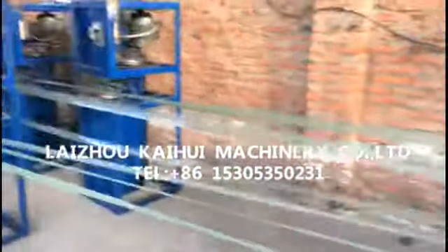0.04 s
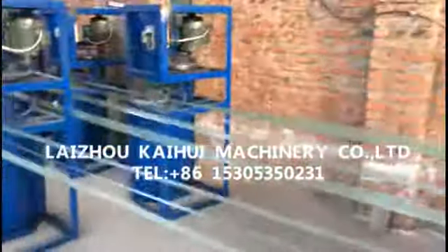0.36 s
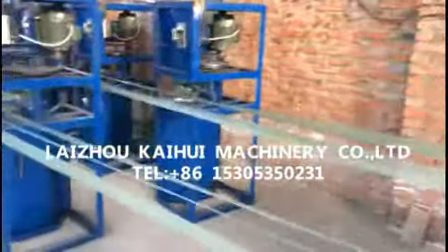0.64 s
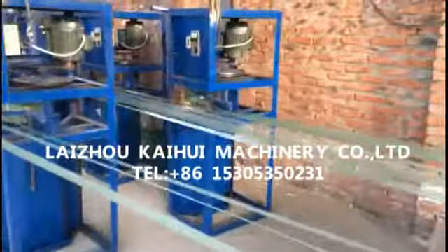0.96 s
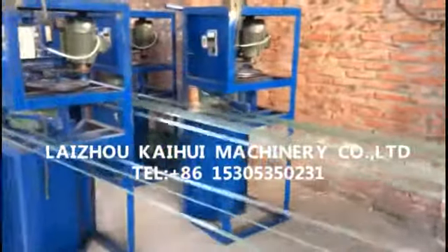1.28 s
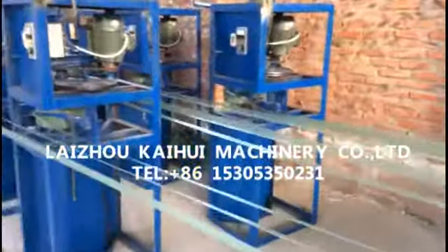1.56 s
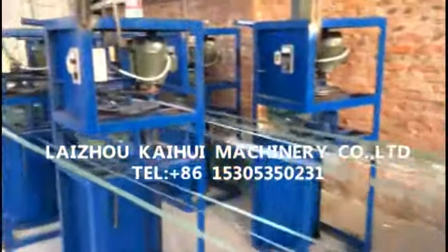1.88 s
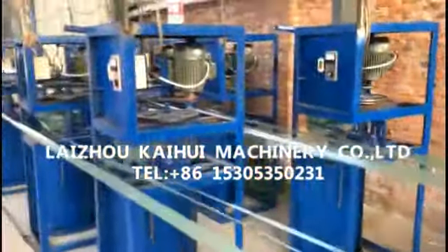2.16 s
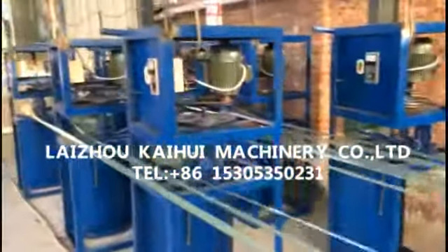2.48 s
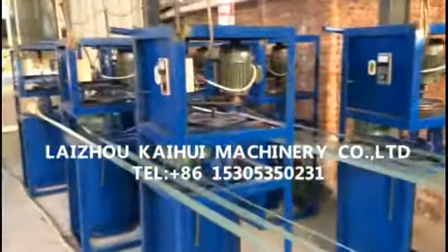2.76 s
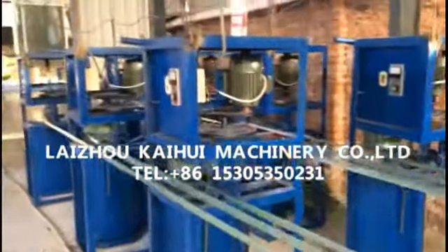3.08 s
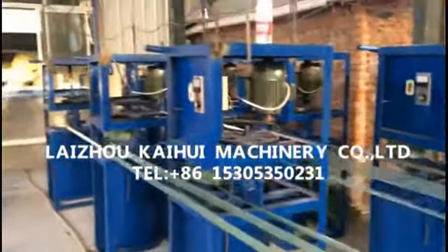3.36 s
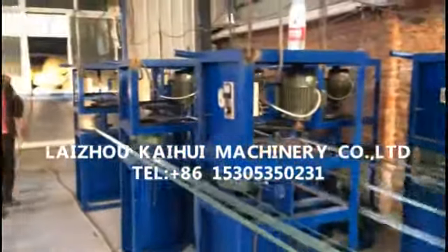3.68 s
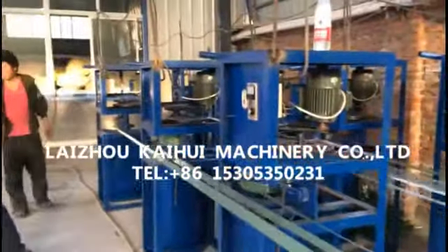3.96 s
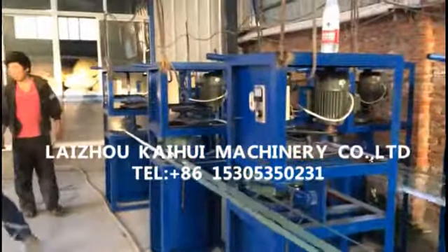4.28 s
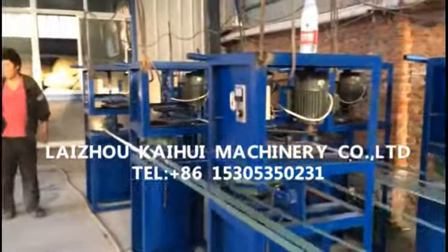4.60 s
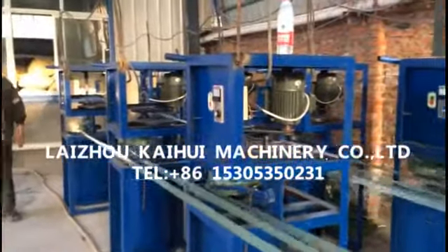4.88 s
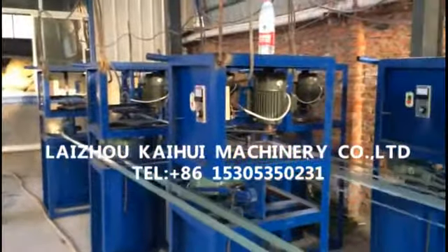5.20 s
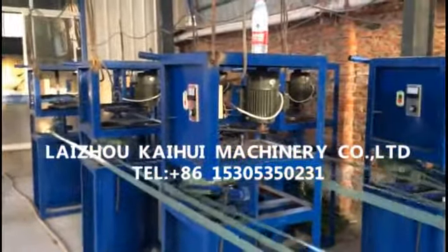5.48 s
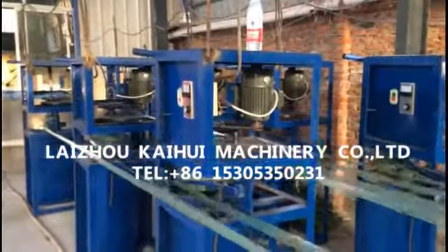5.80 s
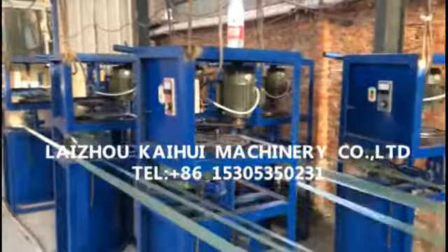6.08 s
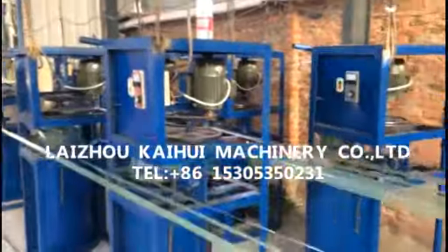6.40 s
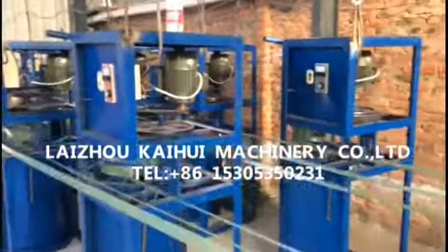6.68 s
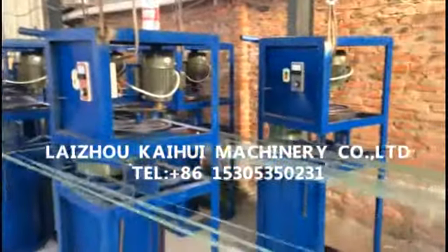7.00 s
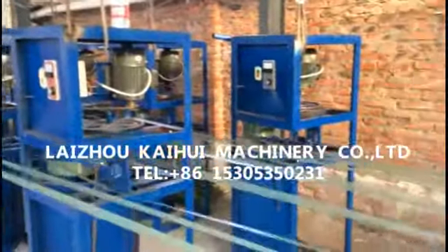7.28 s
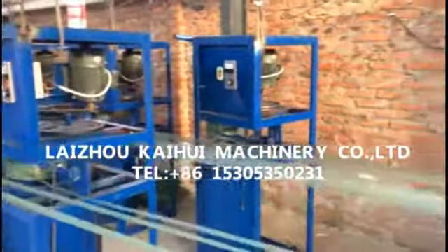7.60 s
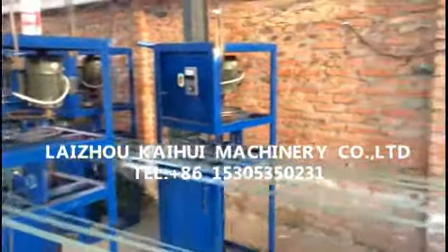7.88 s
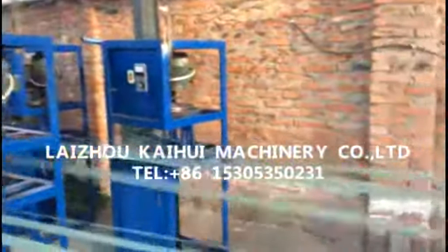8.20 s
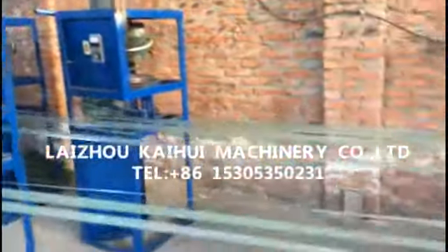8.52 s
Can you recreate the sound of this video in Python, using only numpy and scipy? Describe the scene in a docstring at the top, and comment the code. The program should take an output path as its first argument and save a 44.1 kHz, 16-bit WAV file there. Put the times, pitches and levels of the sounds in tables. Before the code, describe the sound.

A row of twine winding machines runs with a steady din of hissing tape, rattling steel, motor hum and gear whine.

```python
"""A steady din of rattling steel, hum, whine and hiss: a row of twine winders runs in a brick factory hall.
Knocks ring the steel frames, motors hum, gear trains whine at slightly different speeds, spinning drums
churn the air, and plastic tape hisses through its guides. The hall's echoes smear every tone, and the
balance shifts as the listener slowly turns from the wall to face along the row, then back."""
import sys
import numpy as np
from scipy import signal
from scipy.fft import rfft, irfft, next_fast_len
from scipy.io import wavfile

SR = 44100
rng = np.random.default_rng(int(sys.argv[2]) if len(sys.argv) > 2 else 0)


def output_pcm(signal):
    """Save a mono or channel-first signal as 16-bit PCM at the path in sys.argv[1].

    Samples are clipped to [-1, 1] before scaling.
    """
    pcm = np.clip(np.atleast_2d(signal).T, -1, 1) * 32767
    wavfile.write(sys.argv[1], SR, np.round(pcm).astype(np.int16))


N = 381465
TIME = np.arange(N) / SR

# Throughout, turn is 0 facing the wall and 1 along the row; facing_db is the gain added at turn = 1.
# Resonances of the steel frames: pitch_hz, width_hz, relative_db, facing_db
FRAME_MODES = [(1380, 86, -11, 4), (1451, 35, -0.5, 5), (1773, 112, 2, -2), (1851, 45, 3.5, -1),
               (1911, 26, 3, .5), (2386, 43, 5.5, 0), (2437, 48, -4, -2), (2700, 20, -7, 2),
               (2867, 24, -2, 5), (2889, 42, 4.5, -2), (3163, 54, -1, 2), (3455, 130, 0, -1.5),
               (3978, 41, 3.5, 1), (4130, 85, -5, -2), (4620, 94, 3.5, -4.5), (4820, 120, -1, -6)]


def undb(db):
    """Decibels to amplitude gain."""
    return 10 ** (np.asarray(db) / 20)


def unit(x):
    """Scale to rms 1."""
    return x / np.sqrt(np.mean(x ** 2))


def curve(points):
    """Linear interpolation of (time_s, value) points at every sample."""
    return np.interp(TIME, *np.transpose(points))


def bump(centre_s, sigma_s):
    """A Gaussian pulse of height 1."""
    return np.exp(-.5 * ((TIME - centre_s) / sigma_s) ** 2)


def waver(rate_hz):
    """Band-limited random motion of spread 1 that changes rate_hz times a second."""
    knots = rng.standard_normal(512)
    smooth = unit(signal.resample(knots, 4 * len(knots)))
    return np.interp(TIME, np.linspace(0, len(knots) / rate_hz, len(smooth)), smooth)


def noise(points):
    """Random noise at rms 1, its spectrum shaped by (frequency_hz, density_db) points."""
    hz, db = np.transpose(points)
    size = next_fast_len(N, real=True)
    freq = np.maximum(np.arange(size // 2 + 1) * SR / size, 1)
    gain = undb(np.interp(np.log(freq), np.log(hz), db))
    return unit(irfft(rfft(rng.standard_normal(size)) * gain, size)[:N])


def ring(drive, hz, width_hz):
    """Forced response of a damped resonator, gain 1 at its centre."""
    return signal.lfilter(*signal.iirpeak(hz, hz / width_hz, fs=SR), drive)


def frames(turn):
    """Impact excitation: dense knocks of bearings and flyers ring the frames, each mode wavering alone."""
    knocks_per_s, chatter_db = 4000, 3
    knocks = rng.standard_normal(N) * (rng.random(N) < knocks_per_s / SR)
    steel = 0
    for hz, width_hz, db, facing_db in FRAME_MODES:
        gain = undb(db + facing_db * turn + chatter_db * waver(32))
        steel += gain * ring(np.roll(knocks, rng.integers(N)), hz, width_hz)
    return undb(-31 + 2.6 * turn) * unit(steel)


def rattle(turn):
    """Common excitation: loose flyers clatter in decaying bursts that ring the frame modes together."""
    strikes_per_s, decay_s = 45, 0.013
    strikes = rng.uniform(0.53, 1, N) * (rng.random(N) < strikes_per_s / SR)
    energy = signal.lfilter([1], [1, -np.exp(-2 / (decay_s * SR))], strikes)
    clatter = np.sqrt(energy) * noise([(1450, -26), (1800, -3), (3500, 0), (4700, -17)])
    steel = sum(undb(db) * ring(clatter, hz, width_hz) for hz, width_hz, db, _ in FRAME_MODES)
    return undb(-34 - 0.5 * turn) * unit(steel)


def rotor(hz, slip, blur, blur_hz):
    """Echo interference: the tone of a slightly slipping rotor flutters in amplitude and phase."""
    cycles = np.cumsum(hz * (1 + slip * waver(12))) / SR + rng.random()
    phase = 2 * np.pi * cycles + blur * waver(blur_hz)
    return unit((1 + blur * waver(blur_hz)) * np.sin(phase))


def swell_db(hz):
    """Standing waves: a tone swells or fades as the listener moves through the hall's peaks and nodes."""
    # Passages through standing waves: centre_s, sigma_s, pitch_hz, gain_db
    passages = [(0.43, 0.13, 683.5, 7.5), (2.22, 0.14, 683.5, 8), (2.9, 0.41, 683.5, -9),
                (3.68, 0.13, 665, 12), (1.5, 0.21, 788, 10), (1.85, 0.33, 980, 5.5), (4.06, 0.13, 974, 8),
                (0.59, 0.32, 1109, -8), (3.2, 0.26, 1300, 1), (4.1, 0.2, 1109, 6.5), (3.4, .09, 1094, 2),
                (4.5, .1, 1094, 9), (7.3, 0.4, 511.5, 6.5), (3.7, 0.28, 511.5, 3), (1.7, 0.74, 511.5, 0),
                (4.8, 0.18, 578, 9), (6.25, 0.33, 578, 7.5), (1.16, 0.099, 1303, 13),
                (3.3, 0.18, 1303, 4.5), (5.2, .2, 1321, 4), (6.55, .25, 1346.5, 3), (4.2, 0.18, 1358, 7)]
    reach_hz = 9  # only tones this close to a standing wave's pitch are affected
    return sum(db * bump(centre_s, sigma_s)
               for centre_s, sigma_s, pitch_hz, db in passages if abs(pitch_hz - hz) < reach_hz)


def motors(turn):
    """Periodic vibration: each motor hums from its own place in the row; the nearest throbs slowly."""
    # Partials of the nearest motor: pitch_hz, relative_db
    near_partials = [(300, -2), (310, -6.5), (319, 3.5)]
    # Tones of the other motors and pulleys: pitch_hz, level_db, facing_db
    row_tones = [(100.1, -49, 2), (118.4, -43.5, -3.5), (131.4, -44.5, 0.5), (138.2, -49, 3),
                 (177.8, -48.5, 2.5), (193, -52, 0), (350, -58.5, 8), (402, -60, 2), (511.5, -52, 5.5),
                 (578, -55, 5), (617, -57, -4), (667, -51, -1), (683, -45.5, -2), (787.5, -50.5, 2.5),
                 (807, -53, 5), (860, -59, -4), (973, -45, -2), (988, -47, -2), (1094, -48, 0.5),
                 (1110, -44.5, -1)]
    depth_db, period_s, crest_s = 2.5, 1.26, 0.52
    near = sum(undb(db) * rotor(hz, slip=0.0045, blur=0.55, blur_hz=16) for hz, db in near_partials)
    throb_db = depth_db * np.cos(2 * np.pi * (TIME - crest_s) / period_s) + 1.5 * waver(11)
    hum = undb(-43.5 - 3 * turn + throb_db) * unit(near)
    for hz, db, facing_db in row_tones:
        gain = undb(db + facing_db * turn + swell_db(hz))
        hum += gain * rotor(hz, slip=0.00342, blur=0.7, blur_hz=15)
    return hum


def gears(turn):
    """Beating: unequally loaded gear trains mesh at nearby frequencies and merge into one whine."""
    # Tooth-meshing tone of each train: pitch_hz, relative_db, facing_db
    mesh_tones = [(1304, -1.5, 1.5), (1318, -0.5, 2), (1339, 1, -2), (1352, 3, -3), (1360, 0, 0.5),
                  (1371, -4.5, 5), (1387, -1.5, 1.5), (1440, -2.5, 0), (1462, -2, -3), (1486, -9, -2),
                  (1484, -5, 2), (1535, -10, 2)]
    # Level of the whine, sagging slowly and returning quickly: time_s, level_db
    whine_levels = [(0, -34), (0.9, -34), (1.3, -33), (1.6, -29.5), (2.1, -32), (2.9, -34), (3.3, -32.8),
                    (3.8, -34.5), (4.78, -38.5), (4.94, -30.3), (5.4, -32), (7.4, -32), (8.1, -35.5),
                    (8.65, -31)]
    whine = 0
    for hz, db, facing_db in mesh_tones:
        gain = undb(db + facing_db * turn + swell_db(hz))
        whine += gain * rotor(hz, slip=0.0011, blur=0.54, blur_hz=8)
    return undb(curve(whine_levels) + 0.79 * waver(30)) * unit(whine)


def drums():
    """Turbulence: the take-up drums churn the air into a low rumble, and now and then they boom."""
    # Spectrum of the churned air: frequency_hz, density_db
    air_spectrum = [(20, -34), (45, -14.5), (80, -6), (108, 1), (130, 3.5), (160, -3), (185, -7.5),
                    (220, -12), (400, -38)]
    # Level of the rumble: time_s, level_db
    rumble_levels = [(0, -35), (.25, -30.5), (.42, -38), (.9, -38), (1.15, -36), (1.65, -33), (1.85, -35.5),
                     (2.5, -36), (3.35, -39), (3.65, -35.5), (3.85, -41), (4.5, -36.5), (4.9, -31.5),
                     (5.1, -38), (5.55, -33.5), (6.3, -38), (6.95, -34), (7.21, -43), (7.33, -31),
                     (7.58, -38.5), (7.95, -32.5), (8.2, -34), (8.4, -33.5), (8.65, -40)]
    # Hollow booms of the drums: centre_s, sigma_s, pitch_hz, level_db
    booms = [(0.255, 0.082, 200, -35), (4.245, .055, 197, -29.5), (7.864, 0.058, 262, -38)]
    rumble = undb(curve(rumble_levels) + 0.47 * waver(22)) * noise(air_spectrum)
    for centre_s, sigma_s, hz, db in booms:
        boom = noise([(hz / 2, -30), (hz, 0), (hz * 2, -40)])
        rumble += undb(db) * bump(centre_s, sigma_s) * boom
    return rumble


def flickering(points, depth_db, bands):
    """Amplitude modulation: noise is split into overlapping bands, each dipping in level on its own."""
    flicker_hz, rise_limit = 26, 0.47  # a band dips freely but rises only this share of depth_db
    size = next_fast_len(N, real=True)
    spectrum = rfft(noise(points), size)
    freq = np.maximum(np.arange(len(spectrum)) * SR / size, 1)
    band_position = np.interp(np.log(freq), np.log([points[0][0], points[-1][0]]), [0, bands - 1])
    flicker = 0
    for k in range(bands):
        triangle = np.maximum(1 - abs(band_position - k), 0)
        band = irfft(spectrum * triangle, size)[:N]
        flicker += undb(depth_db * np.minimum(waver(flicker_hz), rise_limit)) * band
    return unit(flicker)


def tape(turn):
    """Sliding friction: tape hisses through its guides, varying with tension and briefly scraping."""
    # Spectra of the lower hiss, middle hiss and top treble: frequency_hz, density_db
    low_spectrum = [(600, -9.5), (1650, -6.5), (2050, 0), (2650, 0), (3300, -0.8), (4400, 0), (5500, -5.5),
                    (8000, -33)]
    middle_spectrum = [(2000, -9), (3700, -16.5), (4400, -3), (5200, 0.6), (6500, 1), (7600, -8),
                       (9000, -10.5), (12000, -22)]
    top_spectrum = [(5000, -13.5), (7000, 5.5), (8000, 5.5), (9000, 4), (10000, 1.5), (10800, 2),
                    (11600, -5), (13000, -64)]
    # Moments of harder scraping: centre_s, gain_db
    scrapes = [(3.07, 2.5), (3.67, 4), (6.07, 2.5)]
    tension_db = 0.59 * waver(36)
    scrape_db = sum(db * bump(centre_s, sigma_s=0.023) for centre_s, db in scrapes)
    # Bands of the lower hiss dip briefly, most near the start and end.
    low = flickering(low_spectrum, depth_db=3.8 - 1.7 * turn, bands=14)
    middle = undb(0.76 * waver(48)) * noise(middle_spectrum)
    # The top treble flickers in level, most midway through the scene.
    top = flickering(top_spectrum, depth_db=0.89 + 2.4 * turn, bands=6)
    hiss = (undb(-28.5 + 2.5 * turn + scrape_db) * low
            + undb(-27.5 - 1.6 * turn) * middle
            + undb(-28.5 - 1.5 * turn) * top)
    return undb(tension_db) * hiss


def guides(turn):
    """Friction-driven resonance: tape rubs the metal guides into a thin ring that shifts with the turn."""
    # Resonances of the guides: pitch_hz, width_hz, relative_db, facing_db
    guide_modes = [(5240, 90, 1, 4), (5530, 70, -4, 3), (5910, 65, 2, 6), (6420, 80, -4, 3),
                   (6690, 70, -2, 4), (7360, 90, 0.5, 5), (7900, 160, 1, -14), (8180, 55, 1.5, -3),
                   (8870, 72, -4, 0), (8980, 80, -1, -1), (9870, 80, -1, 0), (10720, 110, -6, 0)]
    rub = rng.standard_normal(N)
    metal = 0
    for hz, width_hz, db, facing_db in guide_modes:
        gain = undb(db + facing_db * turn + 1.5 * waver(9))
        metal += gain * ring(np.roll(rub, rng.integers(N)), hz, width_hz)
    return undb(-33.5 - 1.5 * turn) * unit(metal)


def hall():
    """Diffuse field: the rest of the hall blends into a broad rush, the same in every direction."""
    # Spectrum of the rush: frequency_hz, density_db
    rush_spectrum = [(30, -22), (200, -4.5), (330, 3.5), (470, -4), (620, 2.5), (760, 1.5), (900, -4),
                     (1020, 5.5), (1180, 3.5), (1520, 7.5), (1660, -5.5), (2100, -11.5), (5000, -19)]
    # Level of the rush: time_s, level_db
    rush_levels = [(0, -31), (0.9, -34), (2.0, -32.5), (2.7, -35), (3.2, -32.5), (4.4, -33.5), (5.8, -33.5),
                   (7.2, -34), (7.9, -32.5), (8.65, -33.5)]
    return undb(curve(rush_levels) + 1.7 * waver(16)) * noise(rush_spectrum)


def scene():
    """Superposition: all the sources run at once and are heard alike in both ears."""
    # The listener's heading: time_s, turn
    headings = [(0, 0.17), (2, 0.33), (2.7, 0.32), (3.7, 0.96), (5.7, 0.98), (7.1, 0.2), (8.65, 0.35)]
    turn = curve(headings)
    machines = frames(turn) + rattle(turn) + motors(turn) + gears(turn) + drums()
    mix = machines + tape(turn) + guides(turn) + hall()
    return np.array([mix, mix])


def record(dry):
    """Band limiting: the small microphone loses the deepest bass; the recorder cuts the top steeply."""
    low_hz, top_hz = 38, 11750
    thin = signal.sosfilt(signal.butter(2, low_hz, "highpass", fs=SR, output="sos"), dry)
    return signal.sosfilt(signal.ellip(12, .2, 90, top_hz, fs=SR, output="sos"), thin)


dry = scene()
out = record(dry)
output_pcm(out)
```